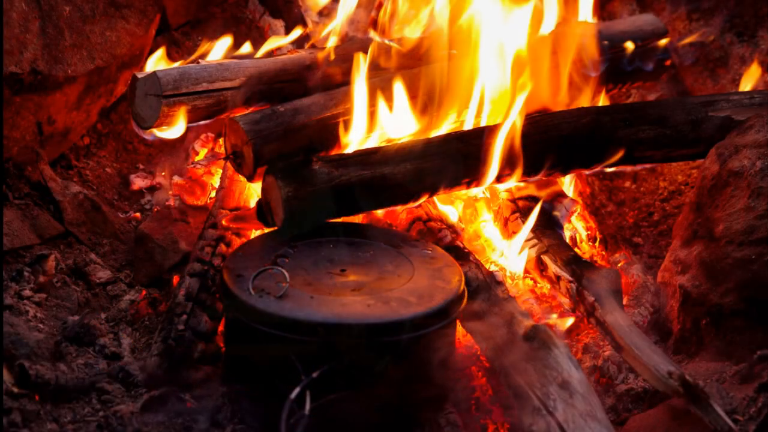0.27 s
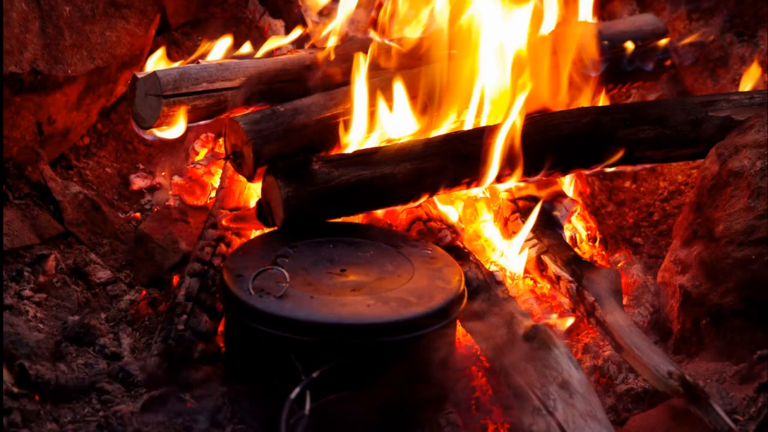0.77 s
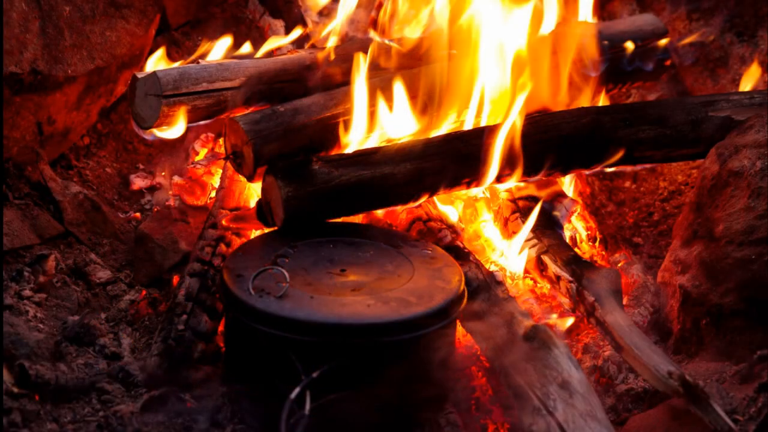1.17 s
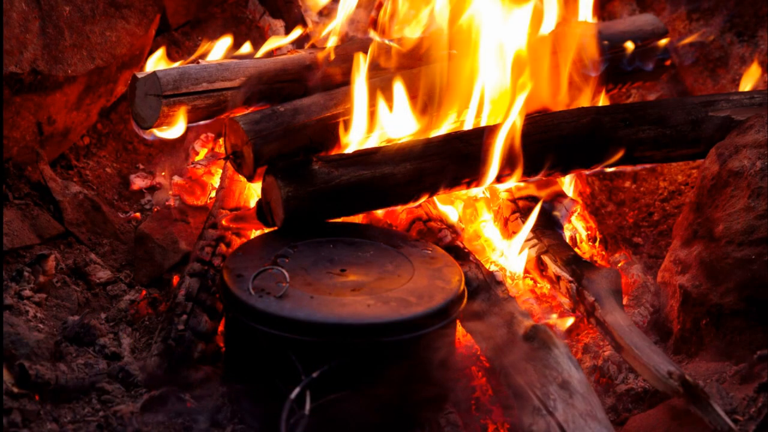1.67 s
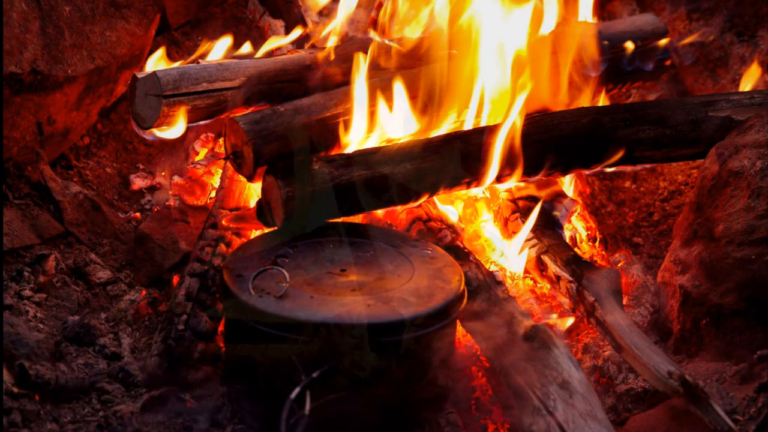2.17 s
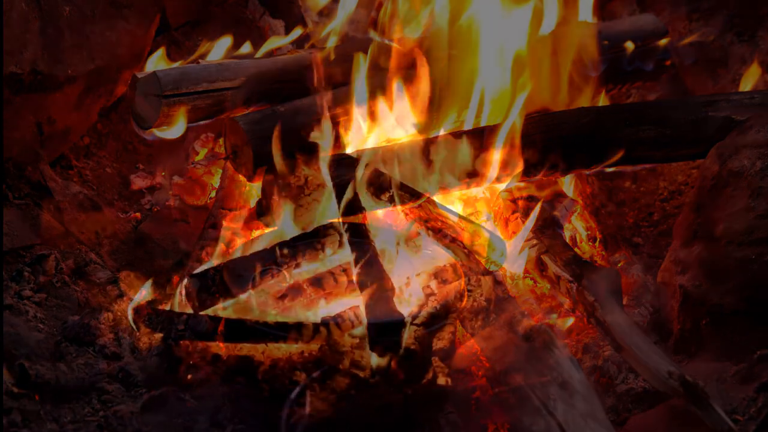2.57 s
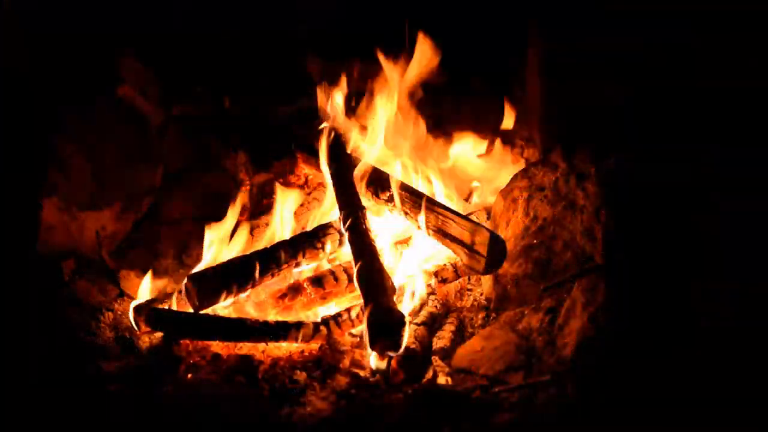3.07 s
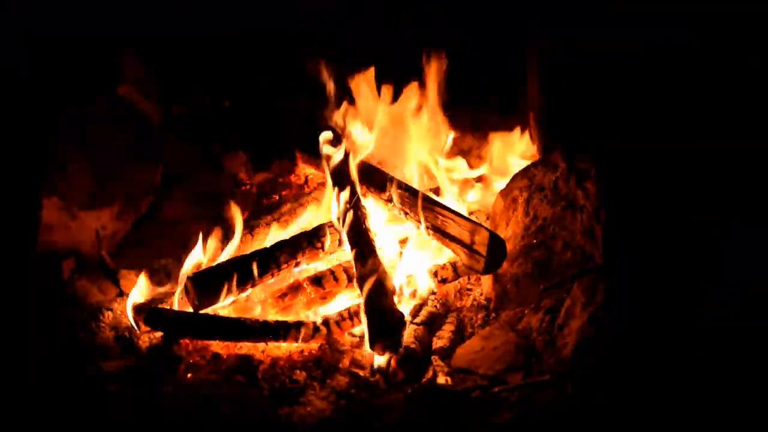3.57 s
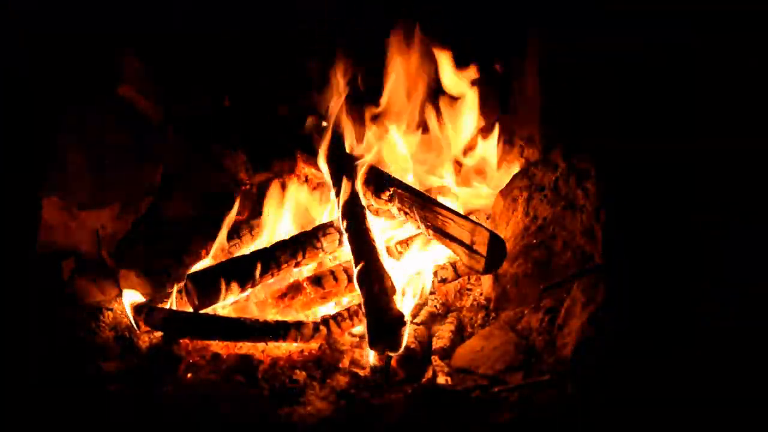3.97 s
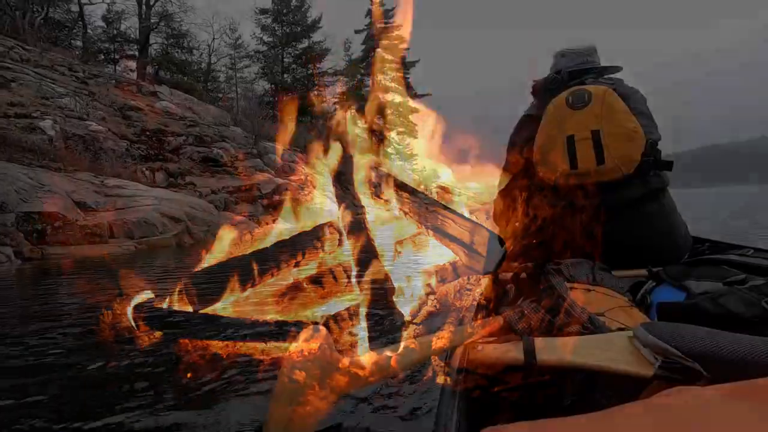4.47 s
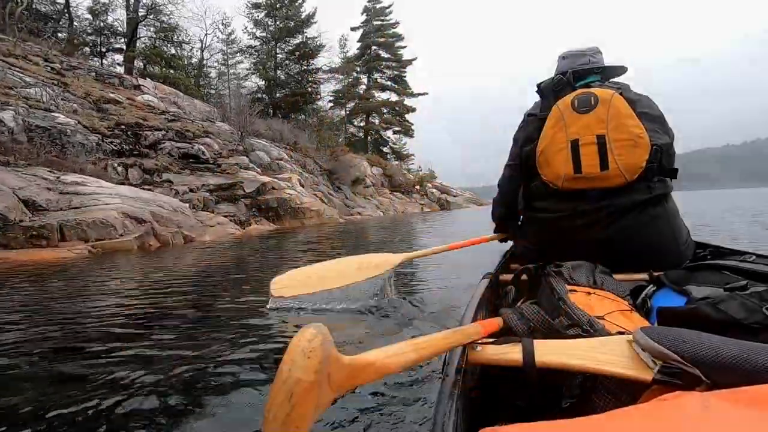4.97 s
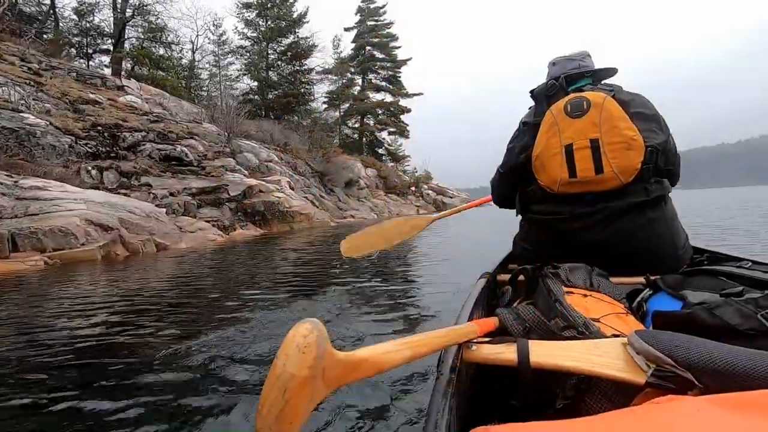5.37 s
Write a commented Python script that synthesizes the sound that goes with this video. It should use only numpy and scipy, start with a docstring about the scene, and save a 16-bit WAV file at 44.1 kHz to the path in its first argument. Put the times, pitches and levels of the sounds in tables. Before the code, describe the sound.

A wood campfire snaps and crackles over a steady whistling chorus of distant small frogs, then cuts abruptly to quiet water with paddle drips.

```python
"""A wood fire at night: sap pockets pop and tick as noise bursts with a bright ring and a dull knock,
embers hiss as flickering noise, the flame roars and flutters low in the draught as soft band-passed thumps.
A pond of small frogs whistles rising peeps, swept sines smeared by the woods, a few of them nearer.
Near the end still water fades in, banded noise with fizzing bubbles and ringing drips from a paddle;
fire and frogs stop abruptly and the water is left alone."""
import sys
import numpy as np
from scipy import signal
from scipy.io import wavfile

SR = 44100
rng = np.random.default_rng(int(sys.argv[2]) if len(sys.argv) > 2 else 0)


def generate_wav(signal):
    """Clip the signal to [-1, 1] and save it as 16-bit WAV at the path in sys.argv[1]."""
    frames = np.transpose(np.atleast_2d(signal))
    scaled = np.clip(frames, -1, 1) * 32767
    pcm = np.round(scaled).astype(np.int16)
    wavfile.write(sys.argv[1], SR, pcm)


N = 248318
FIRE_END_S = 5.115

# Flame and embers over time: t/s, roar level/dB, hiss level/dB
FIRE_LEVELS = [(0, -44, -46), (.6, -46.5, -49), (1.1, -49, -48), (1.5, -46.5, -49.5), (2.5, -47, -48),
               (4, -47.5, -48.5), (4.4, -45.5, -50), (5.1, -46, -48.5)]
# Left-right likeness of the fire noise: f/Hz, correlation (1 = same on both sides, limited to .998 in use)
FIRE_LIKENESS = [(150, .9995), (350, .99), (640, 0.93), (1400, -0.22), (3000, 0.37), (7000, 0.1),
                 (15000, -0.41)]
# Fade-in of the water: t/s, level/dB (of the lapping before its bass cut)
WATER_LEVELS = [(4.2, -75), (4.6, -74), (5.0, -50), (5.2, -57.5), (5.63, -54)]


def from_db(db):
    """Gain of a level in dB."""
    return 10 ** (np.asarray(db) / 20)


def rms_one(x):
    """Scaled to rms 1."""
    return x / np.sqrt(np.mean(x ** 2) + 1e-20)


def peak_one(x):
    """Each channel scaled to peak 1."""
    return x / np.abs(x).max(axis=-1, keepdims=True)


def in_time(rows):
    """Columns of a curve table, sample by sample."""
    s, *columns = np.transpose(rows)
    return [np.interp(np.arange(N) / SR, s, c) for c in columns]


def at_hz(points, hz):
    """A spectrum table read on a log frequency axis."""
    table_hz, values = np.transpose(points)
    return np.interp(np.log(hz), np.log(table_hz), values)


def drift(rate):
    """Slow chance of spread 1, changing about rate times a second."""
    step = 40    # samples between the points of the slow curve
    r = np.exp(-2 * np.pi * rate * step / SR)
    white = rng.standard_normal(N // step + 2002)
    slow = signal.lfilter([1], [1, -2 * r, r * r], white)[2000:]
    return np.interp(np.arange(N) / step, np.arange(len(slow)), rms_one(slow))


def band(x, low_hz, high_hz):
    """Band-pass along time."""
    return signal.sosfilt(signal.butter(2, [low_hz, high_hz], "band", fs=SR, output="sos"), x)


def add(out, s, sound):
    """Mixes a short sound in at time s."""
    i = round(s * SR)
    out[..., i:i + sound.shape[-1]] += sound[..., :out.shape[-1] - i]


def sides(pan_db):
    """Left and right gains for a left-right level difference."""
    return from_db(np.reshape([pan_db / 2, -pan_db / 2], (2, -1)))


def banded_noise(spectrum, likeness, shared_db, own_db, rate):
    """Third-octave bands of stereo noise, each with its level, flicker and likeness; rms 1."""
    out, together = 0, drift(rate)
    edges = 22 * 2 ** (np.arange(30) / 3)
    white = rng.standard_normal((2, 2, N + 4000))      # with a run-in for the low bands
    for k, (low, high) in enumerate(zip(edges, edges[1:])):
        hz = np.sqrt(low * high)
        if spectrum[0][0] < hz < spectrum[-1][0]:
            mid, side = band(white[k % 2], low, min(high, .45 * SR))[:, 4000:]
            alike = np.clip(at_hz(likeness, hz), -1, .998)
            stereo = np.sqrt(1 + alike) * mid + np.sqrt(1 - alike) * side * [[1], [-1]]
            flicker_db = shared_db * together + own_db * drift(rate)
            out = out + from_db(at_hz(spectrum, hz) + flicker_db) * stereo
    return rms_one(out)


def lapping():
    """Still water lapping: noise in bands that waver gently, thinned in the bass."""
    # Colour of the lapping: f/Hz, density level/dB per Hz (before the bass cut)
    water_colour = [(24, -48), (40, 7), (91, -12.5), (163, -4.5), (491, -5), (680, -8), (1240, -7.5),
                    (1410, -9.5), (2700, -11.5), (3560, -13), (5180, -24.5), (11800, -35.5), (16000, -40)]
    likeness = [(6000, .995), (15000, .6)]    # f/Hz, left-right correlation
    noise = banded_noise(water_colour, likeness, shared_db=.5, own_db=.6, rate=12)
    bass_cut = signal.butter(3, 115, "high", fs=SR, output="sos")
    water_db, = in_time(WATER_LEVELS)
    return from_db(water_db) * signal.sosfilt(bass_cut, noise)


def fizz(per_s):
    """Countless tiny bubbles in the wake, each ringing in a narrow band; rms 1."""
    born = (rng.random(N) < per_s / SR) * rng.exponential(1, N)
    dealt, out = rng.integers(0, 16, N), 0
    for k, hz in enumerate(np.geomspace(900, 4200, 16)):
        out = out + band(born * (dealt == k) + 1e-18, hz * .98, hz * 1.02)
    return rms_one(out)


def drips():
    """Drops off the paddle blade tick on the surface and trap bubbles that ring briefly, rising in pitch."""
    # Each drop: t/s, peak of the bubble ring/dB, starting pitch f/Hz
    drops = [(4.8115, -44, 1680), (4.846, -45, 1430), (4.991, -40, 2980), (5.0622, -34, 1770),
             (5.1154, -53, 1240), (5.1374, -46, 2910), (5.142, -34, 1930), (5.1484, -39, 1270),
             (5.1855, -40, 1800), (5.1926, -45, 3440), (5.164, -43, 2210), (5.233, -46, 1800),
             (5.265, -48, 1220), (5.296, -42, 2280), (5.2445, -44.5, 3400), (5.2637, -44, 3450),
             (5.2937, -42.5, 1210), (5.343, -43, 3610), (5.3746, -46, 1975), (5.4116, -49, 4430),
             (5.446, -44, 3500), (5.4844, -50, 3480)]
    t60_1k_s, damping = .038, .49    # decay of a 1 kHz bubble; smaller ones die sooner by this power of pitch
    out, t = np.zeros(N), np.arange(2500) / SR
    for (s, peak_db, hz), white in zip(drops, rng.standard_normal((len(drops), 2500))):
        t60 = t60_1k_s * (1000 / hz) ** damping
        decay = from_db(-60 * t / t60)
        ring = np.sin(2 * np.pi * hz * t * (1 + 5 * t)) * decay * np.minimum(t / .0015, 1)
        splash = peak_one(band(white[::-1] * t * decay, hz * .78, hz * 1.26))   # smaller bubbles around it
        tick = peak_one(band(white * from_db(-60 * t / .01), 1200, 4900))
        add(out, s, from_db(peak_db) * (ring + from_db(-7) * splash + from_db(-14) * tick))
    return out


def woods(x, t60, wet_db):
    """Scatter off trees and water smears far sounds, differently on each side."""
    t = np.arange(SR // 2) / SR
    tail = rng.standard_normal((2, len(t))) * from_db(-60 * t / t60)
    tail = from_db(wet_db) * tail / np.sqrt(np.sum(tail ** 2, axis=1, keepdims=True))
    return x + signal.fftconvolve(x, tail, axes=1)[:, :x.shape[1]]


def peep(length_s, start_hz, end_hz, warble_phase):
    """A whistle that rises and swells, its level warbling 45 times a second."""
    u = np.linspace(0, 1, int(length_s * SR))
    phase = 2 * np.pi * np.cumsum(start_hz + (end_hz - start_hz) * u ** .86) / SR
    swell = np.sin(np.pi * u ** .7) ** .68
    warble = 1 + .72 * np.sin(2 * np.pi * 45 * u * length_s + warble_phase)
    return np.sin(phase) * swell * warble


def chorus(count):
    """Many far frogs call without a pause, each at its own pitch and loudness, blurred by the woods; rms 1."""
    out = np.zeros((1, N + SR))
    for k, (s, size, pitch, spread, loud, warble) in enumerate(rng.random((count, 6))):
        hz = 2380 + 280 * (pitch + spread)
        call = peep(.1 + .08 * size, hz, hz * 1.1, 6 * warble) * from_db(6 * loud)
        add(out, (k + 8 * s) / count * (N / SR + .6), call)
    blurred = woods(out * [[1], [-1]], t60=.72, wet_db=3.5)
    return rms_one(blurred[:, SR // 2:SR // 2 + N])    # starts with the chorus already full


def near_frogs():
    """Peeps of the nearer frogs, inverted on the left as if about half a cycle late there."""
    # Each peep: t/s, starting pitch f/Hz, level/dB (before warble and scatter), left-right/dB
    calls = [(.0, 2636, -51, 1), (0.549, 2713, -52, -8), (.95, 2550, -42.5, 1), (1.329, 2407, -51, -5),
             (1.481, 2550, -50, -7), (2.199, 2555, -41.5, 2), (3.313, 2516, -43.5, -1),
             (3.387, 2540, -51, -15.5), (3.903, 2558, -50.5, -9.5), (4.148, 2590, -46, 0.5),
             (4.365, 2440, -52, 4), (4.655, 2557, -39.5, -0.5)]
    length_s, rise = .175, 1.12    # rise: end pitch over start pitch
    out = np.zeros((2, N))
    for s, start_hz, level_db, pan_db in calls:
        call = peep(length_s, start_hz, start_hz * rise, 0)
        add(out, s, from_db(level_db) * call * sides(pan_db) * [[-1], [1]])
    return woods(out, t60=.3, wet_db=2)


def frog_pond():
    """A steady far chorus, stronger on the left, with the nearer frogs standing out of it."""
    # Chorus over time: t/s, level/dB
    pond_levels = [(0.0, -46.5), (0.28, -48), (2.97, -46.5), (3.29, -46), (3.95, -49), (4.93, -47),
                   (5.1, -48.5)]
    pond_db, = in_time(pond_levels)
    return from_db(pond_db) * sides(3.5) * chorus(count=750) + near_frogs()


def flame_roar(roar_db):
    """Flame turbulence: mostly low noise whose bands flicker quickly."""
    # Colour of the roar: f/Hz, density level/dB per Hz
    roar_colour = [(15, -24), (25, -15), (71, -1), (179, 0), (229, -4.5), (298, -13), (487, -10),
                   (672, -20.5), (1100, -18.5), (2300, -26), (2990, -56), (5060, -120)]
    return from_db(roar_db) * banded_noise(roar_colour, FIRE_LIKENESS, shared_db=2, own_db=2, rate=37)


def ember_hiss(hiss_db):
    """Embers hiss: bright flickering noise, stronger on the right."""
    # Colour of the hiss: f/Hz, density level/dB per Hz
    hiss_colour = [(500, -14.5), (1200, -12), (1700, -12.5), (2200, -15.5), (3400, -10), (4700, -11.5),
                   (6400, -4), (10000, -3), (12500, -7.5), (14500, -12.5), (16500, -15)]
    noise = banded_noise(hiss_colour, FIRE_LIKENESS, shared_db=1.64, own_db=1.6, rate=26)
    return from_db(hiss_db) * noise * sides(-3.5)


def ticking(per_s, spread_db):
    """Small random ticks of embers, dealt to short rings and to places across the fire; rms 1."""
    sizes = from_db(spread_db * np.minimum(rng.exponential(1, N), 4)) * rng.choice([-1, 1], N)
    born, dealt, out = rng.random(N) < per_s / SR, rng.integers(0, 12, N), 0
    for k, hz in enumerate(np.geomspace(4200, 13000, 12)):
        tick = band(sizes * born * (dealt == k) + 1e-18, hz * .88, hz * 1.08)
        left = np.roll(tick, rng.integers(-6, 16)) * rng.choice([-1, 1])    # a few samples early or late
        out = out + np.array([left, tick]) * sides(rng.normal(-3, 2))
    return rms_one(out)


def puffs():
    """Flaps of the flame and the push behind big pops: soft pushes of air, one or two cycles long."""
    # Each thump: t/s, peak/dB, pitch region f/Hz
    thumps = [(0.116, -43, 175), (0.281, -47, 92), (0.372, -41, 238), (0.394, -41, 103), (0.471, -42, 120),
              (0.668, -39.5, 217), (0.71, -36, 130), (0.913, -31, 238), (0.98, -39.5, 205),
              (1.054, -36, 235), (1.095, -38, 108), (1.398, -33.5, 213), (1.608, -41, 191),
              (2.074, -37, 142), (2.125, -39.5, 128), (2.26, -31.5, 104), (2.329, -41, 115),
              (2.491, -36.5, 171), (2.57, -38, 134), (2.65, -36.5, 182), (2.798, -37.5, 178),
              (3.034, -33, 241), (3.078, -32.5, 99), (3.392, -37, 154), (3.428, -36.5, 164),
              (3.628, -33.5, 154), (3.997, -36, 220), (4.084, -32, 470), (4.103, -31.5, 111),
              (4.176, -50, 132), (4.248, -33.5, 133), (4.28, -36, 170), (4.461, -41, 115),
              (4.519, -29.5, 450), (4.543, -34.5, 185), (4.592, -35.5, 93), (4.774, -43, 205),
              (4.894, -29, 248), (4.926, -32.5, 385), (5.082, -30, 268)]
    flutter_per_s, flutter_db = 12, -44.5    # smaller flaps at random, up to 4 dB either way
    out, t = np.zeros(N), np.arange(2500) / SR
    chance = rng.random((int(flutter_per_s * FIRE_END_S), 3))
    flutter = [(s * FIRE_END_S, flutter_db + 8 * (size - .5), 100 * 3.5 ** pitch)
               for s, size, pitch in chance]
    flaps = list(thumps) + flutter
    for (s, peak_db, hz), white in zip(flaps, rng.standard_normal((len(flaps), 2500))):
        push = band(white * t * np.exp(-t * hz / .85), hz * .5, hz * 2.24)
        add(out, s, from_db(peak_db) * peak_one(push))
    return out


def pops():
    """A burst of steam splits the wood: a few ms of dying noise, bright ring, dull knock of the log behind it."""
    # Each pop: t/s, peak on the louder side/dB, ring f/Hz, log knock re crack/dB, treble re crack/dB,
    # left-right/dB
    wood_pops = [(0.0232, -25, 12000, -23, 3, -1), (0.0387, -19, 6800, -31, -2, -11),
                 (0.0441, -18.5, 7100, -37, 0, 5), (0.068, -34, 6880, -22, -6, -6),
                 (0.134, -24.5, 10300, -28, 2, -4), (0.156, -30, 8660, -22, -6, -5),
                 (0.2476, -23.5, 6210, -28, -4, -3), (0.2532, -24, 4860, -23, -5, 0),
                 (0.285, -14, 5780, -20, -1.5, -4), (0.29, -24, 6690, -25, -4, 0),
                 (0.3123, -21.5, 9700, -27, 7, -8), (0.33, -21, 8150, -36, 3, -1.5),
                 (0.377, -31, 6510, -21, -4, -4.5), (0.525, -22.5, 12100, -30, -6, -7),
                 (0.801, -30, 8050, -17, -2, -1), (0.9097, -16, 7140, -6, -4, -6.5),
                 (0.9906, -19, 5900, -16, -1, -2.5), (1.0008, -20.5, 4230, -23, 2.5, 0),
                 (1.0925, -21, 9100, -27, -8, 1), (1.1406, -22.5, 9500, -24, -20, -3),
                 (1.3975, -13, 6800, -41, -4, -2), (1.4087, -16, 5320, -37, 1, -2),
                 (1.5993, -27, 10000, -15, 2, 2), (1.6362, -17.5, 7150, -37, 3, -5),
                 (1.6531, -29, 8800, -33, -14, 5), (1.667, -15, 5300, -39, 5, -8.5),
                 (1.7139, -25.5, 7480, -32, -3, 9), (1.8313, -28.5, 6800, -26, -12, 1),
                 (1.9299, -31, 7400, -23, -6, -1), (2.0387, -13.5, 9700, -45, 2, 1),
                 (2.0767, -27, 8500, -15, 0, -1.5), (2.3744, -23.5, 9000, -24, -10, -2.5),
                 (2.5132, -21.5, 5740, -28, -0.5, -3.5), (2.6196, -24.5, 8800, -25, -19, 4),
                 (2.6346, -22.5, 8800, -29, -26, -5.5), (2.7317, -28, 10500, -7.5, 5, 2),
                 (2.9134, -24.5, 7900, -27, -4, -3.5), (2.9987, -29.5, 7300, -7, -9, -2.0),
                 (3.1098, -27.5, 7250, -29, -8, -4.5), (3.174, -2, 7100, -23, -2, -7),
                 (3.2855, -30, 9650, -27, -14, -1), (3.3103, -19, 6260, -29, 1.5, -2.5),
                 (3.402, -19.5, 8200, -36, -6, -2), (3.436, -28, 9300, -30, -9, -2.5),
                 (3.5852, -27, 8300, -31, -4, -1), (3.632, -19.5, 4230, -24, 0.5, -4),
                 (3.7186, -26, 7600, -31, -2, -4.5), (3.818, -25.5, 8400, -33, -1, -2),
                 (4.0821, -13, 8100, -22, -3.5, -10.5), (4.141, -25.5, 6140, -28, -1.5, -6),
                 (4.2282, -23, 7500, -31, 1.5, -7.5), (4.3806, -12, 9700, -38, 5, -2.5),
                 (4.5174, -14.5, 4700, -6.5, -7.5, -6.5), (4.7121, -26.5, 8300, -33, -18, -6),
                 (4.7877, -24.5, 6300, -23, 0.5, 2), (4.857, -26.5, 10700, -17, 4, 1),
                 (4.8933, -13, 4630, -12, -1, -5.5), (4.9262, -27, 9800, -22, -5, -3.0),
                 (4.9486, -24, 8300, -31, -15, -13), (5.06, -27, 6760, -14, -3, -4.5),
                 (5.0838, -11.5, 4700, -13, -2, -8.5)]
    rise_s, t60_s, split_db = .0012, .006, 11    # tearing before the split, decay, split re noise
    tail_db, tail_t60_s = -24, .05               # scatter off the stones around the fire
    out, t = np.zeros((2, N)), np.arange(1400) / SR
    tearing = np.minimum(t / rise_s, 1) ** 4
    decay = from_db(-60 * np.maximum(t - rise_s, 0) / t60_s)
    envelope = tearing * (decay + from_db(tail_db - 60 * t / tail_t60_s))
    draws = rng.standard_normal((len(wood_pops), 3, 1400))
    for (s, peak_db, hz, knock_db, top_db, pan_db), white in zip(wood_pops, draws):
        # partly shared: each side hears other scatter off logs and stones
        burst = (.47 * white[0] + 1.35 * white[1:]) * envelope
        burst[:, int(rise_s * SR)] += from_db(split_db) * np.sign(white[0, 0])      # the split is one sharp spike
        body = band(band(burst, min(hz * .4, 3600), 13300), min(hz * .13, 3600), 10100)
        ring = band(burst, hz * .87, hz * 1.09)
        crack = body + from_db(6.5) * ring
        top = band(band(burst, 7440, 11170), 11000, .45 * SR)
        knock = band(band(burst, 790, 2300), 500, 2800)
        sound = peak_one(crack) + from_db(top_db) * peak_one(top) + from_db(knock_db) * peak_one(knock)
        sound = peak_one(sound)
        late = int(np.clip(-2.5 * (pan_db + 2), 0, 25))    # samples: far-right pops reach the left later
        sound[0] = np.roll(sound[0], late)
        add(out, s, from_db(peak_db) * sides(pan_db) / sides(pan_db).max() * sound)
    return out


def scene():
    """The fire and the pond until their abrupt end, the water fading in under them and going on alone."""
    water_db, = in_time(WATER_LEVELS)
    bubbles = from_db(water_db - 8.5) * fizz(per_s=1800)
    water = lapping() + bubbles + drips()
    roar_db, hiss_db = in_time(FIRE_LEVELS)
    ticks = from_db(hiss_db - 10.5) * ticking(per_s=370, spread_db=4.5)
    fire = flame_roar(roar_db) + ember_hiss(hiss_db) + ticks + puffs() + pops()
    cut = np.clip((FIRE_END_S - np.arange(N) / SR) / .0024, 0, 1)    # a fade of 2.4 ms
    return (fire + frog_pond()) * cut + water


def record(dry):
    """A steep low-pass takes off the top, 70 dB down from 17050 Hz."""
    return signal.sosfilt(signal.cheby2(12, 70, 17050, fs=SR, output="sos"), dry)


dry = scene()
out = record(dry)
generate_wav(out)
```